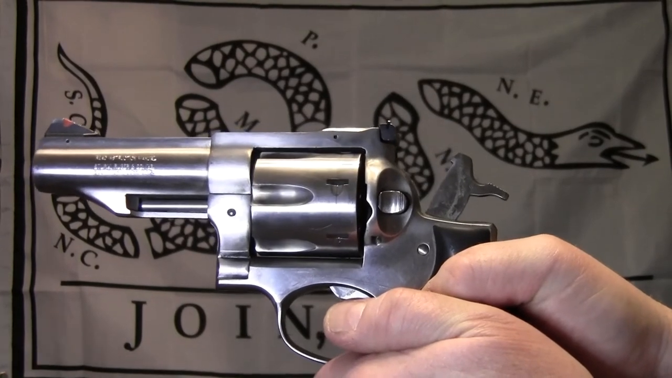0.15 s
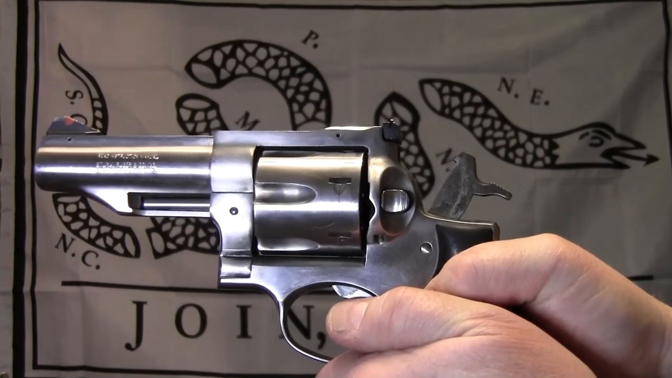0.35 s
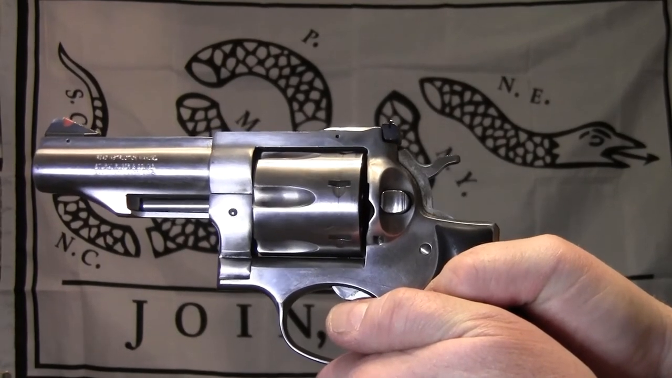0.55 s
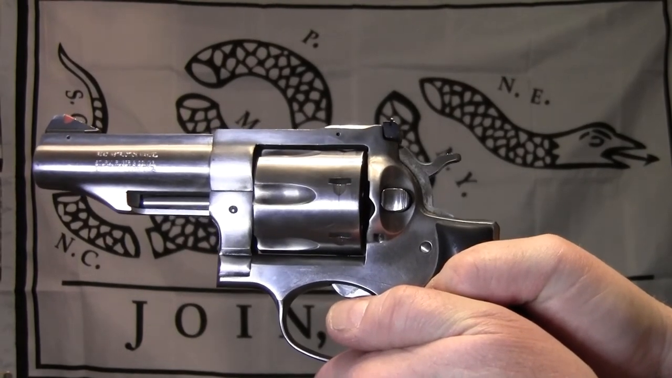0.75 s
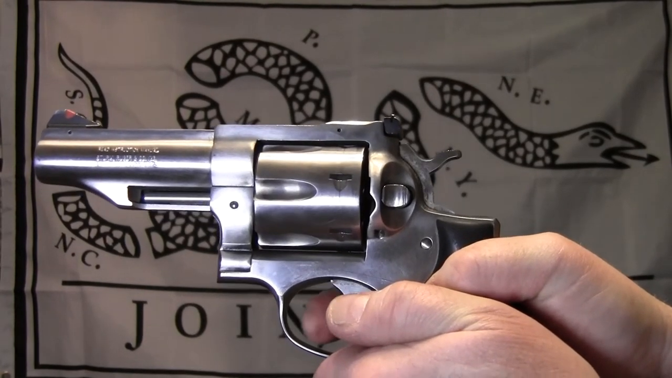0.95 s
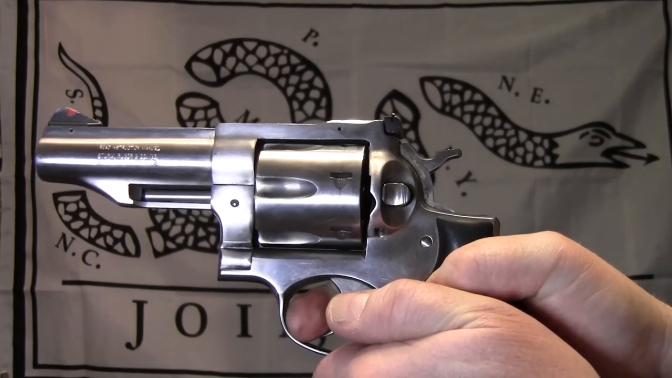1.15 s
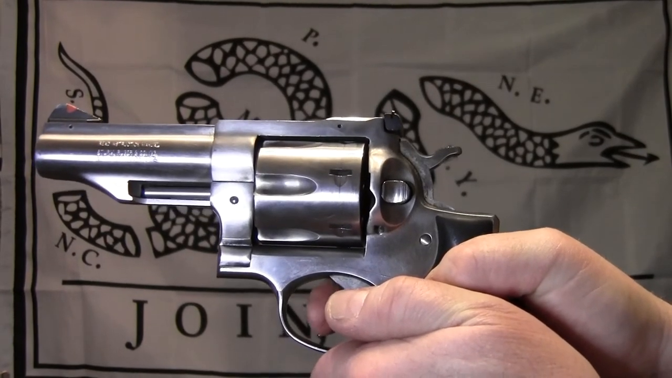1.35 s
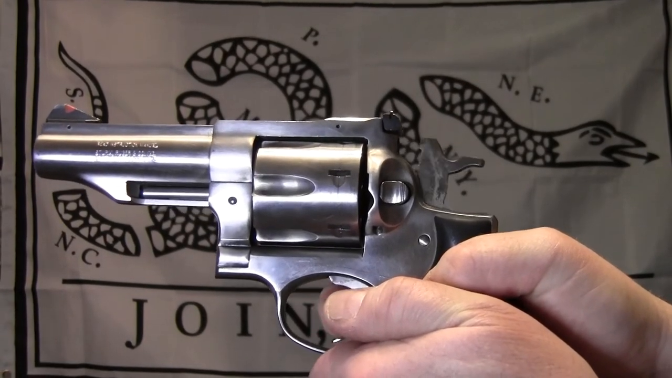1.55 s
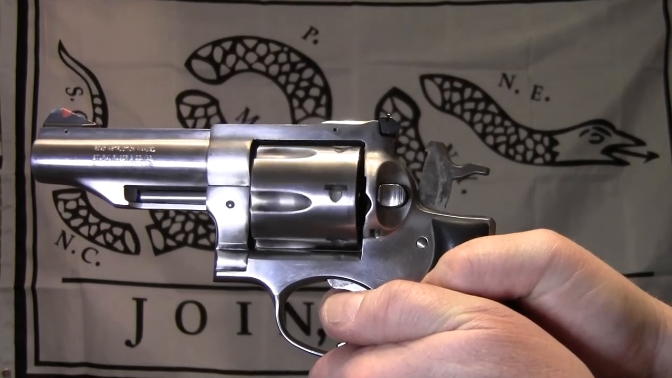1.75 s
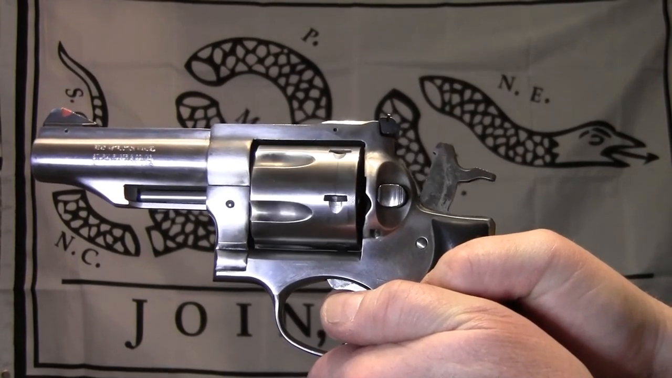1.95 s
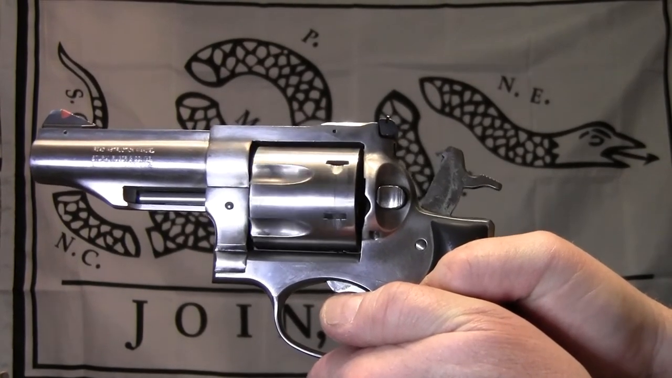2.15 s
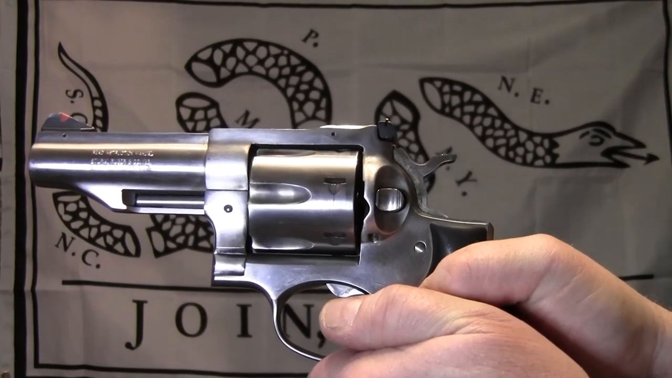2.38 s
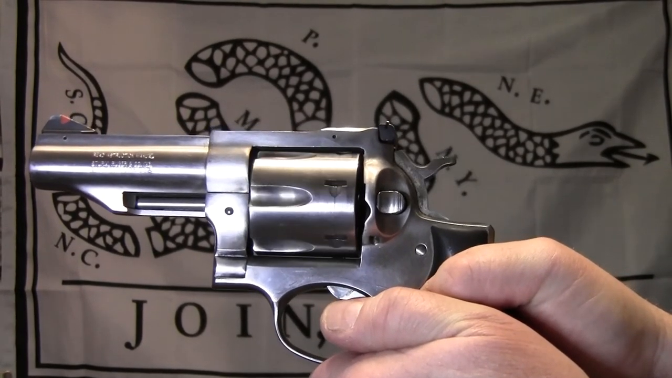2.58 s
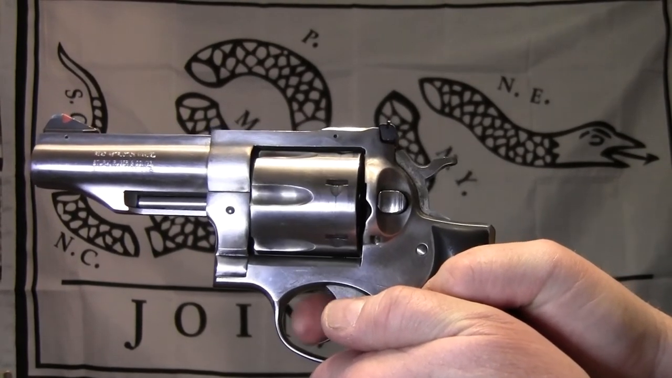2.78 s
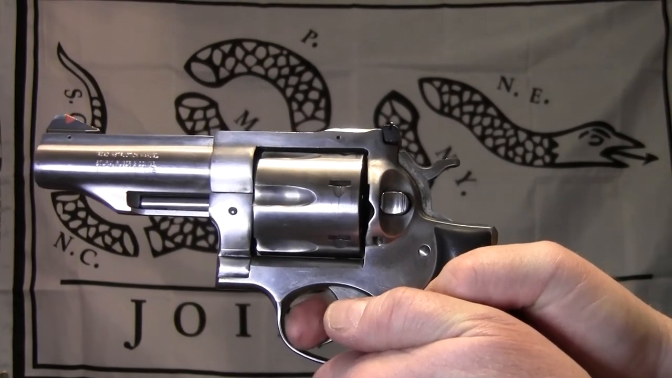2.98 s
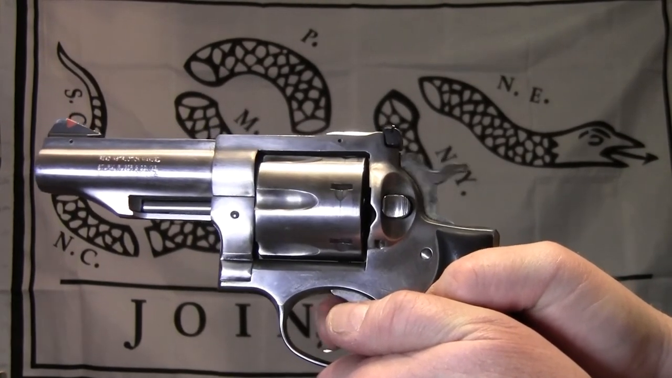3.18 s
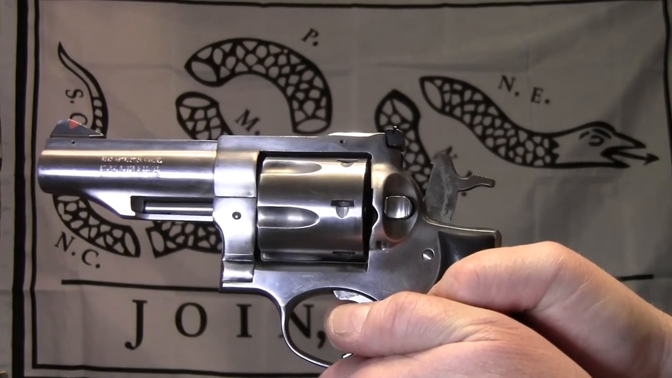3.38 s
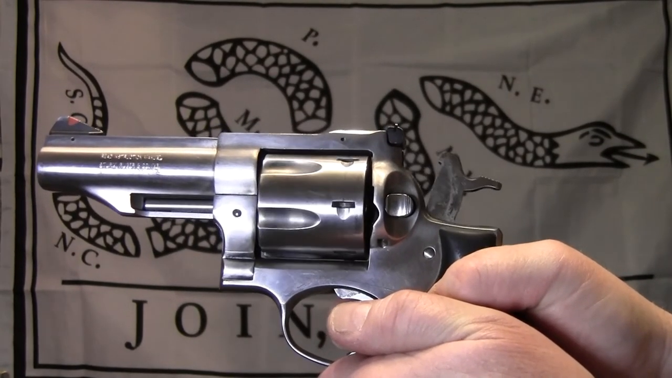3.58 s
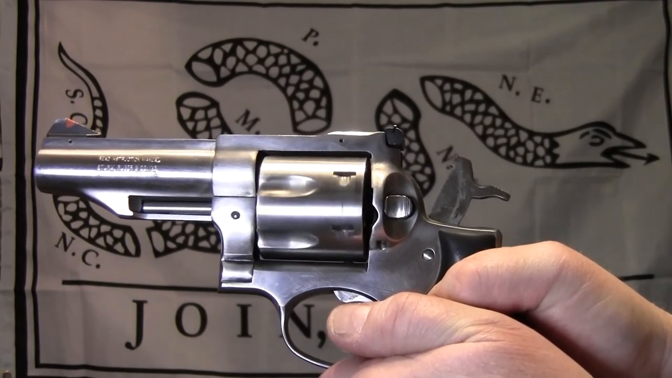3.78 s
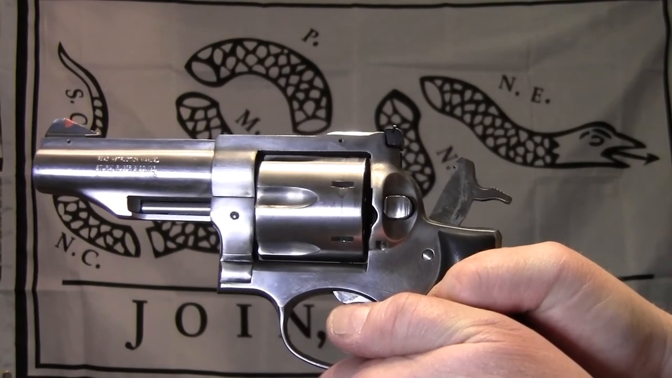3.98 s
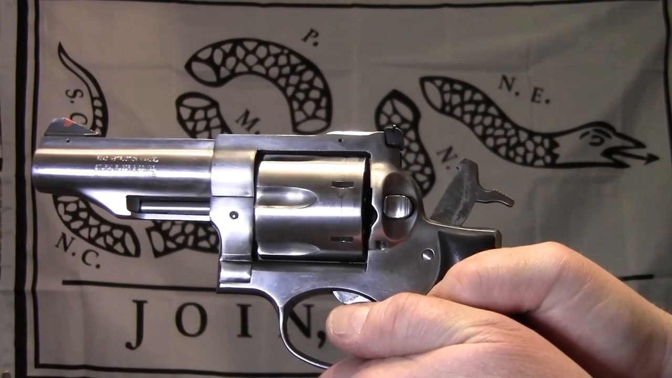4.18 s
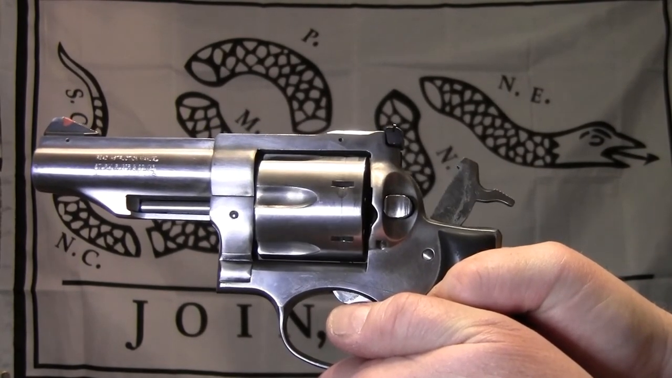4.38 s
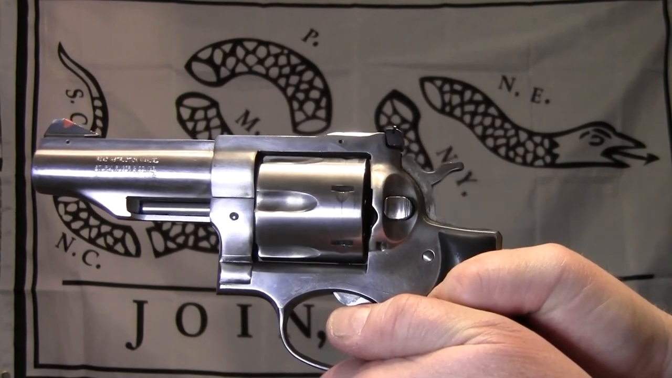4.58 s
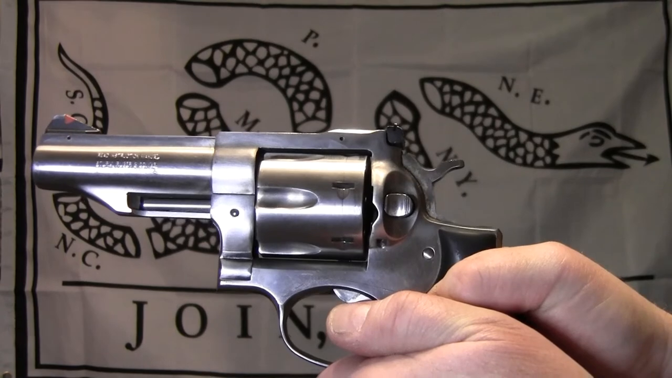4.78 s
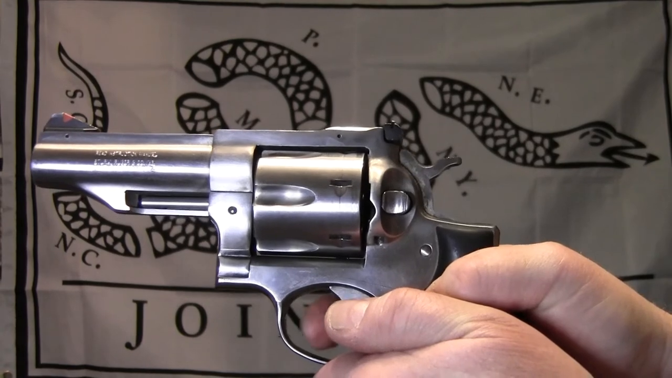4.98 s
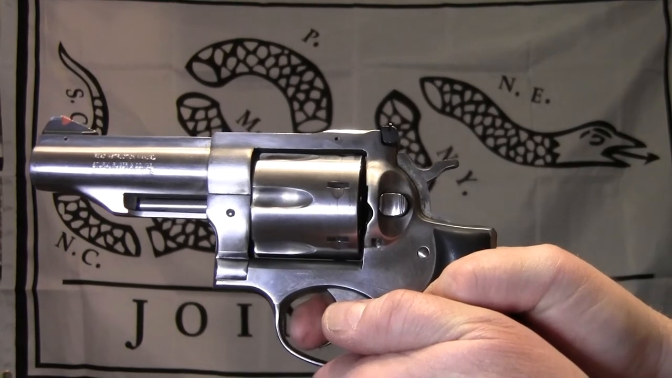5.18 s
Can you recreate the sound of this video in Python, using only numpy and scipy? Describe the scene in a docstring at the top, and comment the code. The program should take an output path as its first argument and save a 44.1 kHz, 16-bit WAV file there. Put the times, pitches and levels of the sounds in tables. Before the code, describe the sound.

Three sharp, ringing hammer snaps from an unloaded revolver, close up, separated by light metallic clicks over a faint room hum.

```python
"""A small room hums and rumbles quietly. Close to one microphone, an empty steel revolver is fired:
the hammer snaps onto the frame and sets it ringing, then the trigger scrapes forward and clicks home.
The inner parts tick as the hammer is pulled back, until a catch (the sear) holds it for the next snap.
There are three snaps in all; a dull knock follows the last, before the trigger returns once more.
The recorder rounds off the snaps, and its gain control turns the room noise down after each one."""
import sys
import numpy as np
from scipy import signal
from scipy.fft import rfft, irfft, next_fast_len
from scipy.io import wavfile

SR = 44100
rng = np.random.default_rng(int(sys.argv[2]) if len(sys.argv) > 2 else 0)


def generate_wav(signal):
    """Clip the signal to [-1, 1] and save it as 16-bit WAV at the path in sys.argv[1]."""
    frames = np.transpose(np.atleast_2d(signal))
    scaled = np.clip(frames, -1, 1) * 32767
    pcm = np.round(scaled).astype(np.int16)
    wavfile.write(sys.argv[1], SR, pcm)


N = 230571
TIME = np.arange(N) / SR


def amp(db):
    """Turn decibels into a gain."""
    return 10 ** (np.asarray(db) / 20)


def add(track, s, sound):
    """Mix a sound into the track, starting at s seconds."""
    start = int(s * SR)
    track[start:start + len(sound)] += sound[:N - start]


def unit(x):
    """Scale a sound so that its energy is 1."""
    return x / np.sqrt(np.sum(x ** 2))


def at_level(x, db):
    """Give a sound the energy of one millisecond at this level."""
    return unit(x) * amp(db) * np.sqrt(SR / 1000)


def decay(t, t60):
    """A fade that falls by 60 dB every t60 seconds (the fade time)."""
    return np.exp(-np.log(1000) * t / t60)


def flatten(x):
    """Make all frequencies in a sound equally strong."""
    return irfft(np.exp(1j * np.angle(rfft(x))))


def colour(x, points, peak_hz=1000, lift_db=0, width=0.21):
    """Filter a sound by a tone curve of (Hz, dB) points, plus a resonance that lifts one pitch."""
    size = 2 * next_fast_len(len(x))
    hz = np.maximum(np.fft.rfftfreq(size, 1 / SR), 1)
    points_hz, points_db = np.transpose(points)
    curve_db = np.interp(np.log(hz), np.log(points_hz), points_db)
    resonance_db = lift_db / (1 + (np.log(hz / peak_hz) / width) ** 2)
    # arrange the filter so that it rings only after a hit, never before
    cepstrum = irfft(np.log(amp(curve_db + resonance_db)))
    cepstrum[1:size // 2] *= 2
    cepstrum[size // 2 + 1:] = 0
    return irfft(rfft(x, size) * np.exp(rfft(cepstrum)))[:len(x)]


def wander(rate):
    """Random drift, roughly between -1 and 1, with `rate` new values a second."""
    return np.interp(TIME * rate, np.arange(N), rng.standard_normal(N))


def background(air_db=-63, rumble_db=-59.5, rumble_hz=31, waver_db=2):
    """Room noise and hiss, a wavering hum, and a deep rumble that comes and goes."""
    # tone of the room noise: (frequency [Hz], level [dB])
    air_tone = [(29, -29.5), (50, 1.5), (81, -4), (125, -4.5), (371, -16), (472, -11.5), (615, -20),
                (765, -21.5), (1400, -26.5), (1540, -28.5), (8340, -36), (16000, -40.5)]
    # brief swells of the rumble: (time [s], half-length [s], rise [dB])
    swells = [(1.29, 0.066, 7.5), (2.685, 0.076, 11.5), (2.984, 0.19, 15.5), (4.0, .05, 9.5)]
    # notes of the hum: (frequency [Hz], level [dB])
    hum_notes = [(119, -72), (263, -81), (463, -80)]
    air = unit(colour(rng.standard_normal(N), air_tone)) * amp(air_db)
    lowpass = signal.butter(3, rumble_hz, fs=SR, output="sos")
    rumble = unit(signal.sosfilt(lowpass, rng.standard_normal(N)))
    swell_db = sum(db * np.exp(-((TIME - s) / half_s) ** 2) for s, half_s, db in swells)
    rumble *= amp(rumble_db + swell_db + waver_db * wander(3.4))
    hum = np.zeros(N)
    for hz, db in hum_notes:
        hum += amp(db + waver_db * wander(2.1)) * unit(np.sin(2 * np.pi * hz * TIME + wander(18)))
    return (air + hum + rumble) * np.sqrt(N)


def chatter(hold_s, t60, rise_s=0.00044, size=4096):
    """Steel on steel: a brief buzz of tiny impacts that dies within milliseconds."""
    t = TIME[:size]
    fade = np.minimum(t / rise_s, 1) * decay(np.maximum(t - hold_s, 0), t60)
    burst = rng.standard_normal(size) * fade
    for _ in range(3):  # even out the tone while keeping the burst short
        burst = flatten(burst) * np.sqrt(fade)
    return burst


def room_response(t60=0.19, late_t60=0.37, late_db=-34, split_hz=4000, gap_s=0.00084, build_s=0.0057):
    """A small furnished room answers a click with a few echoes and a tail whose treble dies first."""
    # first echoes off nearby things: (delay [s], level against the tail [dB])
    echoes = [(.0056, -10), (.0088, -14.5), (0.0121, -6)]
    # tone of the sound the walls send back: (frequency [Hz], level [dB])
    wall_tone = [(60, -18.5), (250, -19.5), (800, -11), (2500, -5), (4500, -8.5), (7000, -2.5), (10000, -2),
                 (15000, -8.5)]
    t = TIME[:24000]
    noise = flatten(rng.standard_normal(len(t)))
    low = signal.sosfiltfilt(signal.butter(2, split_hz, fs=SR, output="sos"), noise)
    tail = noise * decay(t, t60) + amp(late_db) * low * decay(t, late_t60)
    tail = unit(tail * np.clip((t - gap_s) / build_s, 0, 1))
    for s, db in echoes:
        add(tail, s, amp(db) * unit(chatter(hold_s=0.0013, t60=0.0049)))
    return colour(tail, wall_tone)


def in_room(x, room, echo_db=0):
    """The direct sound together with its echo in the room."""
    echo = signal.fftconvolve(x, room)
    return np.pad(x, (0, len(echo) - len(x))) + amp(echo_db) * echo


def hammer(room, sear_early_s=0.011, graze_early_s=0.0051, sear_db=-38):
    """The sear lets go; the hammer grazes the inner parts and slams the frame, which jolts and rings."""
    # hammer falls: (time [s], strike [dB], graze [dB], thump [dB], thump resonance [Hz],
    # steel ring [dB], frame resonance [Hz], its lift [dB])
    snaps = [(0.5378, -4.5, -19, -17, 510, -11.5, 4300, 6), (2.4091, -2, -16.5, -14, 740, -9.5, 4350, 6),
             (4.6271, -1.5, -17, -13.5, 780, -9.5, 2787, 6.5)]
    # tones of the light contacts, the strike and the thump: (frequency [Hz], level [dB])
    light_tone = [(240, -40.5), (400, -9.5), (885, -2), (3530, -2), (5910, -5.5), (6390, -6.5),
                  (8580, -14.5), (10700, -0.5), (14800, -17.5), (16500, -18.5)]
    strike_tone = [(120, -39), (200, -11), (799, -7.5), (1440, -11), (2130, -6.5), (3190, -10), (4210, -8),
                   (6430, -4), (6800, -3.5), (7880, -5.5), (8970, -1.5), (10200, -7), (12100, 2.5),
                   (15300, -12), (16500, -22)]
    thump_tone = [(20, -4.5), (50, 3.5), (130, 7), (280, 1.5), (500, -4), (800, -7), (1400, -13.5),
                  (4000, -37)]
    out = np.zeros(N)
    for s, strike_db, graze_db, thump_db, thump_hz, ring_db, frame_hz, lift_db in snaps:
        release = colour(chatter(hold_s=0.0051, t60=0.015, rise_s=0.0057), light_tone)
        add(out, s - sear_early_s, in_room(at_level(release, sear_db), room))
        graze = colour(chatter(hold_s=0.0033, t60=0.01), light_tone)
        add(out, s - graze_early_s, in_room(at_level(graze, graze_db), room))
        strike = colour(chatter(hold_s=0.0018, t60=0.018), strike_tone, frame_hz, lift_db)
        add(out, s, in_room(at_level(strike, strike_db), room))
        thump = colour(signal.unit_impulse(len(strike)), thump_tone, thump_hz, lift_db=6)
        add(out, s, in_room(at_level(thump, thump_db), room, echo_db=-5))
        add(out, s, at_level(boom(hz=60.18, t60=0.03), thump_db - 12))
        add(out, s, in_room(at_level(steel_ring(), ring_db), room, echo_db=5))
    return out


def boom(hz, t60, size=12000):
    """A short, deep swing after a hit."""
    t = TIME[:size]
    return np.sin(2 * np.pi * hz * t) * decay(t, t60)


def steel_ring(count=4, detune=0.015, size=12000):
    """Each note of the gun is a cluster of close, randomly spread pitches that throb as they fade."""
    # ringing notes of hammer, frame and cylinder: (frequency [Hz], level [dB], fade time [s])
    steel_notes = [(2760, -14.5, 0.065), (3395, -19, 0.1), (4430, -12, 0.06), (5120, -14, .05),
                   (6296, -10, 0.051), (6900, -7.5, 0.027), (8730, -3, 0.044), (8670, -4.5, 0.053),
                   (9010, -15.5, 0.22), (9000, -5, 0.13), (9200, -3.5, 0.058), (9380, -2.5, 0.05),
                   (9430, -2.5, 0.034), (9990, -5.5, 0.045), (10070, -10.5, 0.021), (11260, -3.5, 0.035),
                   (11300, -4.5, 0.032), (11580, -2.5, 0.036), (12530, -2, .03), (12400, -2.5, .03),
                   (11280, -4, 0.056)]
    t = TIME[:size]
    ring = np.zeros(size)
    for hz, db, t60 in steel_notes:
        pitches = hz * (1 + detune * rng.uniform(-1, 1, (count, 1)))
        phases = rng.uniform(0, 2 * np.pi, (count, 1))
        throb = np.sin(2 * np.pi * pitches * t + phases).sum(axis=0)
        ring += amp(db) * np.sqrt(t60) * unit(throb * decay(t, t60))
    return ring


def trigger_return(room, rub_from=-0.23, rub_to=0.3, ping_place=0.38):
    """The trigger slides forward past the same parts each time; only its pace and force differ."""
    # forward strokes: (time at the middle [s], half-length [s], finger delays the end by [s],
    # level [dB], spring ping [dB])
    strokes = [(0.9096, 0.026, 0.019, -33.5, -46), (2.7998, .0203, 0.00085, -33, -32),
               (5.0135, .0232, -.0012, -32.5, -32)]
    # where the trigger meets each part: (place [-1 = start of the stroke, 1 = end])
    places = [-1, -.23, 0, .185, .38, 1]
    # those parts: (level against the stroke [dB], resonance [Hz], its lift [dB], treble tilt [dB/octave])
    parts = [(-16.5, 5595, 5, -3), (-19, 3280, 10, -10), (-5, 3900, 7, 3.5), (-7.5, 2800, -4, -3),
             (-8, 6240, 8, -5), (0, 5500, -3, -2.5)]
    out = np.zeros(N)
    for s, half_s, delay_s, db, ping_db in strokes:
        time_at = lambda place: s + half_s * place + delay_s * max(place, 0) ** 2
        for place, (part_db, peak_hz, lift_db, tilt_db) in zip(places, parts):
            add(out, time_at(place), touch(room, db + part_db, peak_hz, lift_db, tilt_db))
        rubbing = rub(time_at(rub_to) - time_at(rub_from))
        add(out, time_at(rub_from), in_room(at_level(rubbing, db - 9), room, echo_db=-6))
        add(out, time_at(ping_place), in_room(at_level(ping(), ping_db), room, echo_db=-15))
    return out


def touch(room, db, peak_hz, lift_db, tilt_db, echo_db=-5, uneven_db=4):
    """Small steel parts touch lightly; every spot has its own tone, which the room evens out."""
    # basic tone of a tick: (frequency [Hz], level [dB])
    tick_tone = [(200, -23), (600, -7), (1050, 0), (1500, -6.5), (2200, -0.5), (4000, 0), (6500, 3),
                 (8500, -2.5), (13000, 2), (16000, -10)]
    bands_hz = np.geomspace(1500, 16000, 24)
    treble_octaves = np.maximum(np.log2(bands_hz / 4000), 0)
    spot_db = tilt_db * treble_octaves + uneven_db * rng.standard_normal(len(bands_hz))
    tick = colour(chatter(hold_s=0.00047, t60=0.009), tick_tone)
    direct = colour(tick, np.column_stack([bands_hz, spot_db]), peak_hz, lift_db, width=0.085)
    sound = signal.fftconvolve(at_level(tick, db + echo_db), room)
    add(sound, 0, at_level(direct, db))
    return sound


def rub(length_s, grain_db=5):
    """Steel slides over steel in a dense run of tiny slips."""
    # tone of the rubbing: (frequency [Hz], level [dB])
    rub_tone = [(800, -31), (2000, 0), (3300, 4), (6000, -4), (10000, -12), (16000, -27)]
    size = int(length_s * SR)
    slips = rng.standard_normal(size) * amp(grain_db * rng.standard_normal(size))
    slips *= signal.windows.tukey(size)
    return colour(np.pad(slips, (0, size)), rub_tone)


def ping(hz=6480, t60=0.006, rise_s=0.00035, size=4096):
    """A small spring is flicked and stilled at once."""
    t = TIME[:size]
    return np.sin(2 * np.pi * hz * t) * np.minimum(t / rise_s, 1) * decay(t, t60)


def latch(clicks, near_tone, room_tone, room, hold_s, t60, width, room_lift_db):
    """A sprung part lands with two quick contacts; the side facing the microphone has its own tone."""
    out = np.zeros(N)
    for s, first_db, gap_s, second_db, echo_db, peak_hz, lift_db in clicks:
        for when, db in (s, first_db), (s + gap_s, second_db):
            contact = chatter(hold_s, t60)
            direct = colour(contact, near_tone, peak_hz, lift_db, width)
            add(out, when, at_level(direct, db))
            spread = colour(contact, room_tone, peak_hz, lift_db + room_lift_db, width)
            add(out, when, signal.fftconvolve(at_level(spread, db + echo_db), room))
    return out


def trigger_reset(room):
    """The trigger springs home, striking twice."""
    # trigger clicks: (time [s], level [dB], gap to second contact [s], its level [dB],
    # echo gain [dB], resonance [Hz], its lift [dB])
    clicks = [(1.0736, -24, 0.0021, -20.5, -5, 2760, 5.5), (2.8437, -20.5, .0022, -22.5, -5, 10250, 10),
              (5.0635, -19, 0.00206, -21, -6.5, 2360, 9.5)]
    # tones sent to the microphone and into the room: (frequency [Hz], level [dB])
    near_tone = [(210, -26.5), (350, -16.5), (532, -12.5), (747, -13), (1010, -6.5), (1490, -21.5),
                 (2310, -1), (2580, -5.5), (4260, -12), (4920, -5), (7250, -6), (9690, -15.5), (11400, -9),
                 (14500, -21), (16500, -17)]
    room_tone = [(410, -65), (700, -15), (1080, -5), (1300, -15), (1840, -4), (2300, 0), (3640, -7),
                 (7990, -3), (10400, -7.5), (14200, -6.5), (16000, -15)]
    return latch(clicks, near_tone, room_tone, room,
                 hold_s=0.000775, t60=0.0087, width=0.036, room_lift_db=-4.5)


def inner_ticks(room, peak_hz=5400, lift_db=2):
    """Inner parts tick as the hammer comes back, the cylinder turns and the trigger is squeezed."""
    # light ticks: (time [s], level [dB], treble tilt [dB/octave])
    ticks = [(1.364, -59, -4), (1.4715, -55, -5), (1.5316, -53, -6), (1.637, -57.5, -8),
             (2.3828, -54.5, -8), (3.1225, -52, 3.5), (3.2239, -47, -4), (3.2527, -45, -2.5),
             (3.3124, -60, -8.5), (4.1450, -62.5, -12)]
    out = np.zeros(N)
    for s, db, tilt_db in ticks:
        add(out, s, touch(room, db, peak_hz, lift_db, tilt_db))
    return out


def sear_catch(room):
    """The sear drops into place and holds the pulled-back hammer."""
    # sear clicks: (time [s], level [dB], gap to second contact [s], its level [dB],
    # echo gain [dB], resonance [Hz], its lift [dB])
    clicks = [(1.8586, -24, .0014, -24, -6, 4670, 3), (3.4854, -21.5, 0.001307, -28.5, -6.5, 6910, 7.5)]
    # tones sent to the microphone and into the room: (frequency [Hz], level [dB])
    near_tone = [(410, -32), (700, -29.5), (1050, -19), (1550, -31.5), (2360, -7.5), (3240, -23),
                 (4640, -7), (5150, -10.5), (6710, -1.5), (8190, -17.5), (9850, -13), (11200, -19.5),
                 (12200, -11.5), (14600, -20), (16500, -12)]
    room_tone = [(820, -51), (1400, -18), (2330, -11.5), (4120, -16), (5770, -2.5), (7010, -10.5),
                 (7680, -5.5), (10800, -10), (14200, -4.5), (16000, -15)]
    return latch(clicks, near_tone, room_tone, room,
                 hold_s=0.00046, t60=0.0071, width=0.031, room_lift_db=-2)


def knock(room):
    """A soft, dull bump with a deep swing after it."""
    # the bump: (time [s], level [dB])
    bumps = [(4.7162, -31)]
    # its tone: (frequency [Hz], level [dB])
    bump_tone = [(30, -2), (70, -21), (250, 12.5), (600, 3), (1200, 10), (1700, -33), (4000, -26)]
    out = np.zeros(N)
    for s, db in bumps:
        bump = colour(chatter(hold_s=0.00062, t60=0.0048), bump_tone)
        add(out, s, in_room(at_level(bump, db), room, echo_db=2))
        add(out, s, at_level(boom(hz=66, t60=0.19), db - 2))
    return out


def scene():
    """Each part's sound takes its own paths through the room; one microphone feeds both channels."""
    sources = hammer, trigger_reset, sear_catch, trigger_return, inner_ticks, knock
    mono = sum(source(room_response()) for source in sources) + background()
    return np.array([mono, mono])


def record(dry, threshold_db=-32, slope=0.42, attack_s=0.056, release_s=2.5, ceiling=0.94, top_hz=15700):
    """Gain control turns loud sounds down and recovers slowly; peaks are rounded, the top treble cut."""
    pole = np.exp(-1 / (attack_s * SR))
    smooth = lambda x: signal.lfilter([1 - pole], [1, -pole], x)
    level_db = 10 * np.log10(smooth(dry[0] ** 2) + 1e-18)
    wanted_cut_db = slope * np.maximum(level_db - threshold_db, 0)
    recovery = np.exp(-TIME / release_s)
    held_cut_db = np.maximum.accumulate(wanted_cut_db / recovery) * recovery  # each cut fades slowly
    rounded = ceiling * np.tanh(dry * amp(-smooth(held_cut_db)) / ceiling)
    lowpass = signal.ellip(8, 0.2, 70, top_hz, fs=SR, output="sos")
    return signal.sosfilt(lowpass, rounded)


dry = scene()
out = record(dry)
generate_wav(out)
```